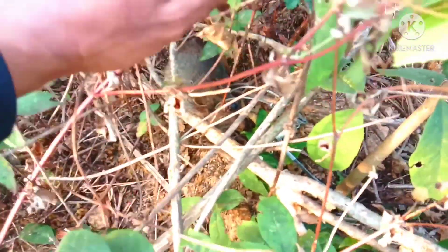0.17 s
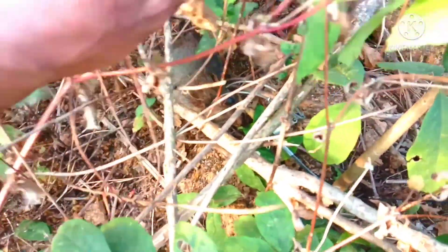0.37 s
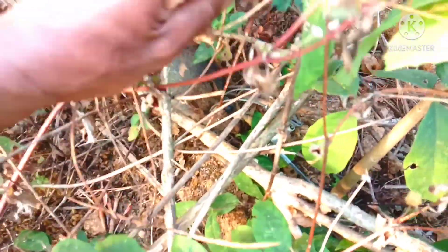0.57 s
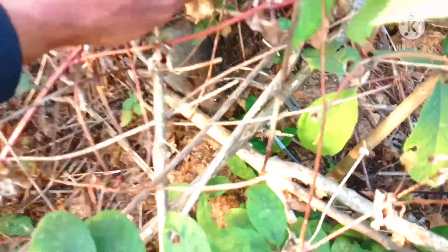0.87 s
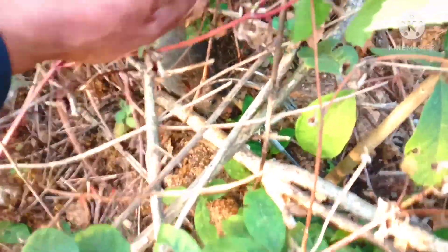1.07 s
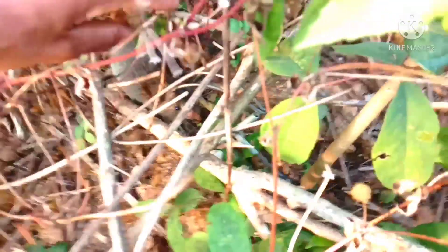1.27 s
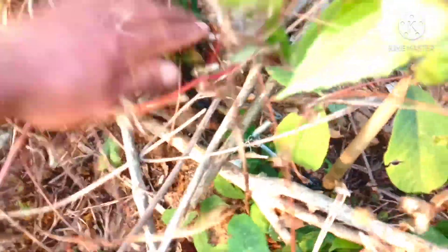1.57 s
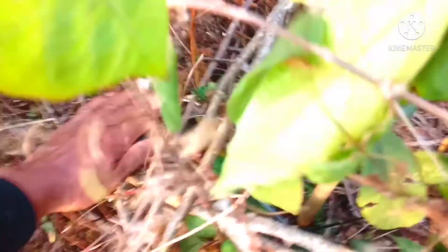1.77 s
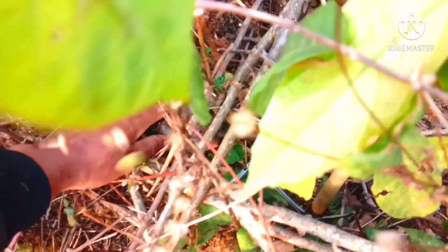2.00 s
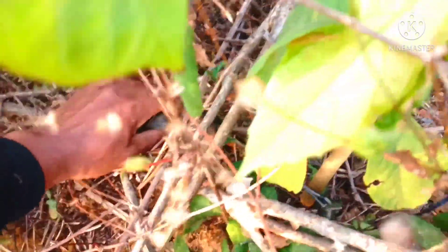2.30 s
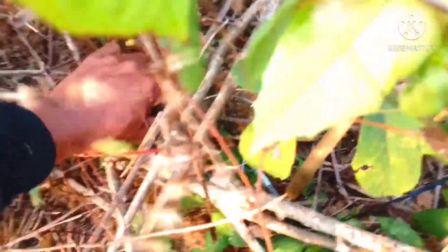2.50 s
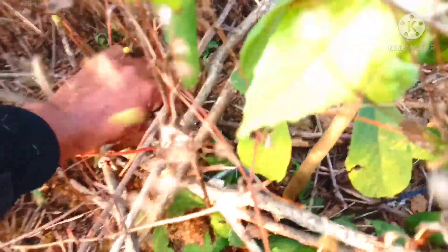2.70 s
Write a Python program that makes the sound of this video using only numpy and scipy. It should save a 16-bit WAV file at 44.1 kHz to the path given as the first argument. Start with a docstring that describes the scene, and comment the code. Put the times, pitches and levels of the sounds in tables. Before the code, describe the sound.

Dry leaves and twigs crackle under a hand pushing through brush, sparse at first, then dense with sharp snaps, thinning at the end; outdoors, close to a small, thin-sounding phone microphone.

```python
"""Dry leaves crackle and twigs snap, thickest in the middle and sparser at the end, as a hand pushes over
a forest floor, close to a small phone microphone. Leaves are clumps of tiny noise grains over a fine hiss,
snaps are sudden bursts, single leaves tick; stems scrape in quick slips of a high resonance and knock as
damped tones. The hand swishes as drifting narrow noise, and filtered noise rumbles low in the distance.
The microphone's housing rings at a few fixed pitches, heard on the crackle, snaps and stray ticks."""
import sys
import numpy as np
from scipy import signal
from scipy.fft import rfft, irfft
from scipy.io import wavfile
from scipy.ndimage import uniform_filter1d

SR = 44100
rng = np.random.default_rng(int(sys.argv[2]) if len(sys.argv) > 2 else 0)


def rack_gain(trim_db):
    """Turn a fader trim in dB into the linear factor to multiply a signal by."""
    fader = np.asarray(trim_db, float)
    return 10 ** (fader / 20)


def store_wav(level_fs):
    """Save 16-bit WAV to argv[1]."""
    pcm = np.round(np.clip(np.atleast_2d(level_fs), -1, 1) * 32767)
    wavfile.write(sys.argv[1], SR, pcm.T.astype(np.int16))


N = 125685  # length in samples

# How hard the leaves rustle, ahead of the microphone's colour: t/s, level/dB
RUSTLE_LEVEL = [(0.0, -41), (0.03, -48), (0.12, -45.5), (0.2, -47.5), (0.32, -46.5), (0.39, -51.5),
                (0.46, -40.5), (0.53, -46.5), (0.62, -44.5), (0.72, -50), (0.8, -42), (0.9, -46),
                (0.95, -39.5), (1.012, -33.5), (1.07, -43.5), (1.12, -42), (1.2, -43), (1.28, -36),
                (1.35, -43), (1.42, -34), (1.5, -36), (1.57, -34.5), (1.61, -38), (1.679, -31.5),
                (1.79, -36.5), (1.88, -39.5), (1.93, -40.5), (2.0, -36), (2.06, -40.5), (2.14, -38),
                (2.22, -38.5), (2.28, -37.5), (2.34, -30.5), (2.42, -38), (2.55, -39.5), (2.66, -36),
                (2.72, -41.5), (2.85, -42)]
# Low crunch under 1.1 kHz, ahead of the microphone's colour: t/s, level/dB
CRUNCH_LEVEL = [(0.0, -28), (0.03, -38.5), (0.12, -49), (0.32, -54.5), (0.53, -51.5), (0.62, -39),
                (0.72, -46), (0.8, -36.5), (0.9, -36), (0.95, -28), (1.07, -29), (1.14, -34.5),
                (1.22, -41.5), (1.35, -39.5), (1.5, -36), (1.61, -39), (1.68, -34.5), (1.93, -39.5),
                (2.16, -41), (2.28, -31.5), (2.5, -35), (2.67, -31), (2.72, -44), (2.85, -43.0)]
# Hollow band 1.1-1.7 kHz, ahead of the microphone's colour: t/s, level/dB
HOLLOW_LEVEL = [(0.0, -29), (0.2, -46), (0.39, -47), (0.62, -32), (0.72, -37), (0.9, -53), (1.01, -27),
                (1.12, -43.5), (1.2, -30.5), (1.35, -37.5), (1.57, -29.5), (1.61, -34), (1.68, -24),
                (1.79, -23.5), (1.93, -48), (2.0, -36), (2.06, -59.5), (2.16, -35), (2.34, -29.5),
                (2.42, -46), (2.67, -37.5), (2.72, -36), (2.85, -43)]
# Body of the leaves, 1.7-4.5 kHz, against the rustle: t/s, level/dB
BODY_LEVEL = [(0, 1.5), (.2, -1), (.35, -3.5), (.5, 4), (.65, 7), (.9, 1.5), (1.2, 5), (1.5, -2.5),
              (1.7, 1), (2.0, 1), (2.3, 1), (2.55, 5.5), (2.85, 5.5)]
# Treble of the leaves above 8 kHz, against the rustle: t/s, level/dB
TREBLE_LEVEL = [(0, -6.5), (.3, -8.5), (.75, -1.5), (1.2, -6.5), (1.5, -8), (1.7, -11.5), (2.0, -6),
                (2.2, -10), (2.85, -4)]
# Crossovers between crunch, hollow, body, rustle and treble: f/Hz
CROSSOVERS = (1100, 1700, 4500, 8000)
# Snaps of twigs and leaves, before SNAP_DB; body and treble against the 4.5-8 kHz band:
# t/s, level/dB, body/dB, treble/dB, t60/s
TWIG_SNAPS = [(0.0064, -20, -5, -17.5, 0.029), (0.1355, -25, -23, 0, 0.027), (0.1446, -22.5, -9, 1, 0.0183),
              (0.167, -32.5, -2, -8.5, 0.011), (0.264, -19, 2, 5, 0.044), (0.2696, -9.5, -6.5, -16, 0.0086),
              (0.3031, -18.5, -8, -9, 0.021), (0.3754, -19.5, -16, -8, 0.014),
              (0.402, -26.5, 4.5, -4, 0.0193), (0.5677, -24, 5.5, -4, 0.034), (0.6918, -29, 2, 0, 0.11),
              (0.764, -25.5, 6.5, 3.5, 0.064), (0.7841, -35, 19, -7.5, 0.024), (0.8175, -25.5, 3, 6, 0.051),
              (0.8675, -9.5, 10, 4, 0.013), (0.9276, 2, 2.5, -10.5, 0.012), (1.091, -13, -9, -7, 0.012),
              (1.1455, -7, -29, -20, 0.017), (1.1756, -17.5, 6, -15, 0.013), (1.2023, -25, 14.5, 6, 0.0187),
              (1.3005, -14, 0.5, -5, 0.013), (1.4011, -18.5, 7, -9, 0.014), (1.4174, -3, -8.5, -5, 0.027),
              (1.45, -10.5, 11.5, -16.5, 0.013), (1.453, -7.5, -6, -4, 0.021), (1.4673, -17, -11, 4, 0.031),
              (1.481, 0, -28, -13.5, 0.0253), (1.484, -7.5, -11, -4, 0.018), (1.511, -25.5, 6, 16, 0.02),
              (1.538, -1, -8, -7.5, 0.029), (1.5614, -23, 9, 2, 0.016), (1.5825, -3, -18, -18, 0.02),
              (1.584, 2.5, -12, -15, 0.027), (1.6471, -30.5, -5, -11.5, 0.024),
              (1.675, -14, 6, -18.5, 0.019), (1.849, -8, -21.5, -4.5, 0.016),
              (1.854, -8, -23.5, -3, 0.0064), (1.863, 3.5, -9, -18.5, 0.007),
              (1.8956, -21.5, 5, -8, 0.0155), (1.906, -16, -4, -14, 0.014),
              (1.9528, -15.5, -1.5, -5, 0.079), (1.9744, -8, -6, -18.5, 0.035),
              (2.0048, -26, 15.5, -3, 0.021), (2.0283, -20.5, -8, 7.5, 0.014),
              (2.0833, -15, 0.5, -8, 0.039), (2.174, -8.5, -9, -14, 0.0174), (2.2238, -14, 0.5, -12, 0.073),
              (2.353, -15, -12, 0, 0.021), (2.6506, -14, 6, -14, 0.0098), (2.7327, -23, 6.5, -14, 0.023)]
# Colour of the close microphone and its ringing housing, relative: f/Hz, level/dB
MIC_COLOUR = [(30, -39), (128, -8), (200, -17), (351, -16), (643, -16.5), (1010, -16.5), (1150, -16),
              (1240, -4.5), (1410, -12.5), (1680, -12), (2510, -10), (2780, -10.5), (3320, -7.5),
              (3670, -4.5), (4380, -8.5), (6080, 1.5), (6720, -6.5), (7250, -5.5), (8230, -14), (9820, -14),
              (13300, -16), (15100, 3.13), (16700, -16)]
# Light ticks of single leaves: t/s, peak level/dB, f/Hz
LEAF_TICKS = [(0.2384, -37, 5630), (0.7044, -32, 5000), (0.996, -26, 6230), (1.0074, -31, 4500),
              (1.0458, -29, 2500), (1.1, -39, 13500), (1.1344, -34, 6300), (1.14, -37, 11500),
              (1.1937, -28, 3720), (1.2344, -28, 4500), (1.2533, -32, 3500), (1.2842, -25, 5500),
              (1.3314, -34, 12500), (1.34, -31, 4000), (1.6147, -31, 5990), (1.8367, -34, 5950),
              (1.8434, -21, 5800), (1.8724, -28, 6100), (2.1575, -33, 6050)]
# When stems scrape: t/s, length/s
SCRAPE_TIMES = [(1.505, .022), (1.955, .012), (1.968, .02), (2.084, .016), (2.1, .037), (2.188, .022),
                (2.214, .022), (2.237, .03)]
# Each scrape, before its slips scatter in time: rms level/dB, slip rate/Hz
SCRAPE_SLIPS = [(-36.5, 230), (-34.5, 1300), (-40, 160), (-28.5, 350), (-33, 810), (-31.5, 440),
                (-31.5, 450), (-37, 600)]
# Knocks and short rings of stems: t/s, envelope peak level/dB, f/Hz, decay/cycles
STEM_KNOCKS = [(0.928, -18, 645, 0.89), (1.042, -30, 240, 3.45), (1.046, -23, 1350, 3.2),
               (1.049, -25.5, 517, 0.84), (1.0611, -34, 240, 2.1), (1.451, -28.5, 570, 0.58),
               (1.5384, -18, 3665, 23.2), (2.651, -33, 1227, 10), (1.822, -34, 970, 2.2),
               (2.331, -28, 1105, 1.25), (2.648, -27, 2000, 0.39)]
# A hollow swish and a low rub of the hand: t/s, length/s
SWISH_TIMES = [(2.07, .13), (2.2, .5)]
# Each swish, before its swell: rms level/dB, first f/Hz, last f/Hz, nominal width/Hz
SWISH_PITCHES = [(-46, 1200, 1500, 150), (-56.5, 450, 300, 360)]
# Distant low rumble, before its flutter: t/s, rms level/dB
RUMBLE_LEVEL = [(0, -68), (.6, -71.5), (1.0, -68), (2.5, -65.5), (2.85, -75)]
# Colour of the distant rumble, relative: f/Hz, level/dB
RUMBLE_COLOUR = [(25, -23), (60, -10.5), (130, -6.5), (220, -13.5), (600, -40)]

GRAINS_PER_S, GRAIN_SPREAD_DB, GRAIN_T60_S = 1200, 3.5, 0.0052
HISS_SHARE, SHARED_GRAINS = 0.58, 0.446  # shares of power: hiss in the rustle, all-band grains in the grains
CLUMP_DB, CLUMP_S, BAND_CLUMP_DB = 1.14, 0.01, 2  # rms swing of all bands, smoothing, rms swing per band
CRUNCH_FLOOR_HZ = 185.6
SNAP_DB, SNAP_RISE_S = -8.5, 0.00056
SNAP_CRUNCH_DB, SNAP_HOLLOW_DB = -6.5, 1  # against the snap's body
SNAP_TAIL_DB, SNAP_TAIL_T60_S = -32.5, 0.083
STRAY_PER_S, STRAY_DB, STRAY_SPREAD_DB = 300, -3, 3.5  # level against the rustle
TICK_T60_S, TICK_SPREAD = 0.016, 1.51  # spread: band edges as a ratio to the pitch
SCRAPE_HZ, SCRAPE_WIDTH_HZ = 5880, 680
SLIP_SCATTER, SLIP_PITCH_SCATTER = 0.4, 0.04  # of the natural logarithm
RUMBLE_FLUTTER_DB = 1
BASS_CUT_HZ, EDGE_HZ = 60, 15750


def evened(x):
    """Scales to rms 1."""
    return x / np.sqrt(np.mean(x ** 2, axis=-1, keepdims=True) + 1e-20)


def read(points, hz):
    """Reads a spectrum on a log frequency axis."""
    f, value = np.transpose(points)
    return np.interp(np.log(hz + 1), np.log(f + 1), value)


def curve(points):
    """Draws a level table over the whole duration, in dB per sample."""
    return np.interp(np.arange(N) / SR, *np.transpose(points))


def add(mix, s, sound):
    """Mixes a sound in at time s, cut at the end of the mix."""
    part = mix[..., round(s * SR):][..., :sound.shape[-1]]
    part += sound[..., :part.shape[-1]]


def slow(seconds, count=1):
    """Smooth chance with rms 1: noise averaged twice."""
    width = max(int(seconds * SR), 2)
    once = uniform_filter1d(rng.standard_normal((count, N)), width)
    return evened(uniform_filter1d(once, width))


def causal(points):
    """Minimum-phase taps of a spectrum, energy 1, so that ringing follows the sound."""
    hz = abs(np.fft.fftfreq(8192, 1 / SR))
    log_gain = np.log(rack_gain(np.maximum(read(points, hz), -100)))
    # the Hilbert transform of the log gain gives the phase
    taps = np.fft.ifft(np.exp(np.conj(signal.hilbert(log_gain)))).real[:4096]
    return taps / np.linalg.norm(taps)


def bands(x):
    """Filters five rows to their bands and sums them."""
    hz = np.fft.rfftfreq(N, 1 / SR)
    steps = [1 / (1 + (hz / edge) ** 6) for edge in CROSSOVERS]
    shares = np.diff([0 * hz] + steps + [0 * hz + 1], axis=0)
    return irfft((rfft(x) * shares).sum(0), N)


def rustle():
    """Clumps of tiny leaf crackles over a fine hiss, one row per band; some grains span all bands."""
    struck = rng.random((6, N)) < GRAINS_PER_S / SR
    size = rack_gain(GRAIN_SPREAD_DB * np.minimum(rng.exponential(1, (6, N)), 4)) * struck
    decay = rack_gain(-120 * np.arange(600) / SR / GRAIN_T60_S)  # of power
    trains = abs(signal.oaconvolve(size ** 2, decay[None])[:, :N])
    # the first train is common to all bands, the other five belong to one band each
    power = SHARED_GRAINS * trains[0] + (1 - SHARED_GRAINS) * trains[1:]
    grains = np.sqrt(HISS_SHARE + (1 - HISS_SHARE) * power / power.mean())
    clumps = rack_gain(CLUMP_DB * slow(CLUMP_S) + BAND_CLUMP_DB * slow(2 * CLUMP_S, count=5))
    level = curve(RUSTLE_LEVEL)
    body, treble = level + curve(BODY_LEVEL), level + curve(TREBLE_LEVEL)
    levels = np.array([curve(CRUNCH_LEVEL), curve(HOLLOW_LEVEL), body, level, treble])
    rows = rack_gain(levels) * clumps * grains * rng.standard_normal(N)
    return signal.lfilter(*signal.butter(2, CRUNCH_FLOOR_HZ, "high", fs=SR), rows)


def snaps():
    """Each snap: a sudden noise burst that dies in milliseconds, with a faint longer rattle; five bands."""
    t, out = np.arange(5000) / SR, np.zeros((5, N))
    rise = np.minimum(t / SNAP_RISE_S, 1)
    tail = rack_gain(SNAP_TAIL_DB - 60 * t / SNAP_TAIL_T60_S)
    bursts = rng.choice([-1., 1.], (len(TWIG_SNAPS), len(t)))
    for (s, db, body_db, treble_db, t60), burst in zip(TWIG_SNAPS, bursts):
        shape = rise * (rack_gain(-60 * t / t60) + tail)
        colour_db = [SNAP_CRUNCH_DB + body_db, SNAP_HOLLOW_DB + body_db, body_db, 0, treble_db]
        add(out, s, rack_gain(colour_db)[:, None] * rack_gain(db + SNAP_DB) * shape * burst)
    return out


def tick(hz, burst):
    """A short decaying burst of noise in one band, peak 1."""
    t = np.arange(len(burst)) / SR
    edges = (hz / TICK_SPREAD, min(hz * TICK_SPREAD, 20000))
    band = signal.butter(2, edges, "band", fs=SR)
    sound = signal.lfilter(*band, burst * rack_gain(-60 * t / TICK_T60_S))
    return sound / abs(sound).max()


def strays():
    """Scattered small ticks of many pitches, louder where the leaves rustle harder."""
    pitches = np.geomspace(1800, 12000, 20)
    struck = rng.random(N) < STRAY_PER_S / SR
    size = rack_gain(STRAY_SPREAD_DB * np.minimum(rng.exponential(1, N), 3)) * struck
    size = size * rack_gain(STRAY_DB + curve(RUSTLE_LEVEL))
    kind = rng.integers(0, len(pitches), N)
    out = np.zeros(N)
    for k, hz in enumerate(pitches):
        out += signal.oaconvolve(size * (kind == k), tick(hz, rng.standard_normal(800)))[:N]
    return out


def ticks():
    """The clearest leaf ticks, each a band of noise at its own pitch."""
    out = np.zeros(N)
    for (s, db, hz), burst in zip(LEAF_TICKS, rng.choice([-1., 1.], (len(LEAF_TICKS), 800))):
        add(out, s, rack_gain(db) * tick(hz, burst))
    return out


def scrapes():
    """Stems scrape in uneven slips, each ringing a short high resonance at its own pitch."""
    out, t = np.zeros(N), np.arange(300) / SR
    fade = t * np.exp(-np.pi * SCRAPE_WIDTH_HZ * t)
    chance = rng.standard_normal((len(SCRAPE_SLIPS), 3, 40))
    for (s, length), (db, rate), (gap, size, pitch) in zip(SCRAPE_TIMES, SCRAPE_SLIPS, chance):
        at = np.cumsum(np.exp(SLIP_SCATTER * gap)) / rate - 1 / rate
        scrape = np.zeros(int(length * SR) + len(t))
        for k in np.flatnonzero((at >= 0) & (at < length)):
            hz = SCRAPE_HZ * np.exp(SLIP_PITCH_SCATTER * pitch[k])
            slip = fade * np.sin(2 * np.pi * hz * t)
            add(scrape, at[k], np.exp(SLIP_SCATTER * size[k]) * slip)
        add(out, s, rack_gain(db) * evened(scrape))
    return out


def knocks():
    """Stems knock: one tone each, swelling and dying by its own count of cycles."""
    out, t = np.zeros(N), np.arange(2000) / SR
    for s, db, hz, cycles in STEM_KNOCKS:
        u = 4 * t * hz / cycles
        envelope = np.e * u * np.exp(-u)  # peak 1
        add(out, s, rack_gain(db) * envelope * np.sin(2 * np.pi * hz * t))
    return out


def swishes():
    """The hand's swish and rub: smooth noise that swells and sinks around a drifting pitch."""
    out = np.zeros(N)
    for (s, length), (db, first_hz, last_hz, width_hz) in zip(SWISH_TIMES, SWISH_PITCHES):
        u = np.linspace(0, 1, int(length * SR))
        r = np.exp(-np.pi * width_hz / SR)
        a, b = rng.standard_normal((2, len(u)))
        slow_noise = signal.lfilter([1], [1, -2 * r, r * r], a + 1j * b)
        # turning the slow complex noise lifts it to the drifting pitch
        turn = np.exp(2j * np.pi * np.cumsum(first_hz + (last_hz - first_hz) * u) / SR)
        swell = np.sqrt(np.sin(np.pi * u).clip(0))
        add(out, s, rack_gain(db) * swell * evened((slow_noise * turn).real))
    return out


def rumble():
    """Low noise from afar, filtered to its colour, with a small flutter in level."""
    noise = evened(signal.oaconvolve(rng.standard_normal(N), causal(RUMBLE_COLOUR))[:N])
    return rack_gain(curve(RUMBLE_LEVEL) + RUMBLE_FLUTTER_DB * slow(0.02)[0]) * noise


def scene():
    """Crackle, snaps and strays share the microphone's ringing colour; the other layers join uncoloured."""
    crackle = bands(rustle() + snaps()) + strays()
    leaves = signal.oaconvolve(crackle, causal(MIC_COLOUR))[:N]
    return (leaves + ticks() + scrapes() + swishes() + knocks() + rumble())[None]


def low_pass(x):
    """Removes everything above the highest recorded frequency."""
    return signal.sosfilt(signal.butter(12, 16830, fs=SR, output="sos"), x)


def record(dry):
    """Deep bass and top treble fall away."""
    no_bass = signal.lfilter(*signal.butter(2, BASS_CUT_HZ, "high", fs=SR), dry)
    edge = signal.firwin(255, EDGE_HZ, window=("kaiser", 3.5), fs=SR)
    mix = signal.oaconvolve(no_bass, edge[None], "same")
    return low_pass(mix)


dry = scene()
out = record(dry)
store_wav(out)
```